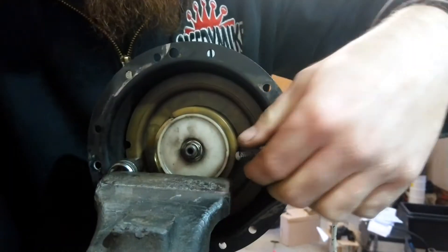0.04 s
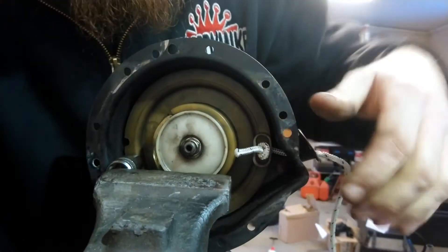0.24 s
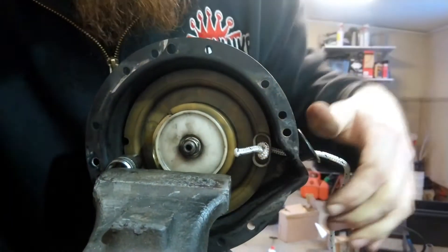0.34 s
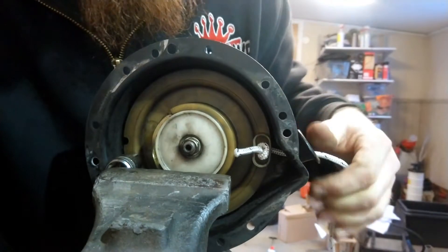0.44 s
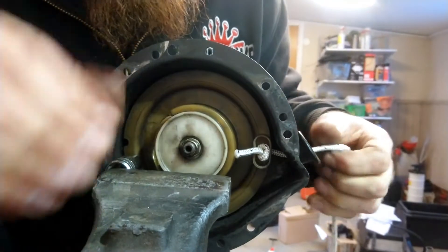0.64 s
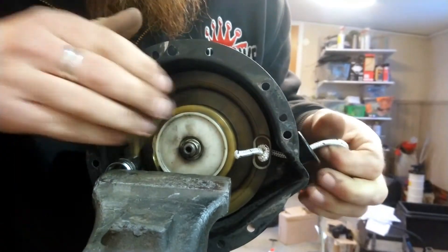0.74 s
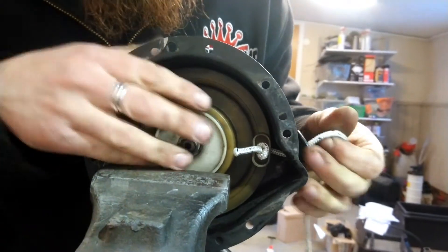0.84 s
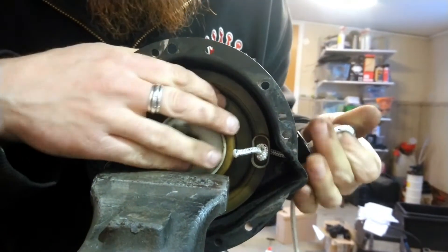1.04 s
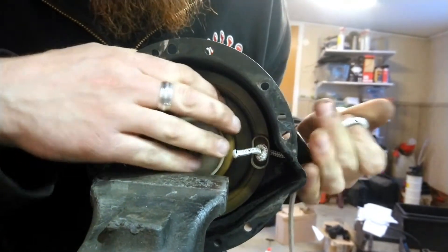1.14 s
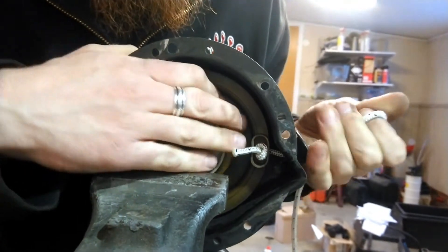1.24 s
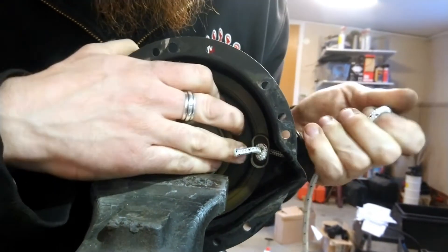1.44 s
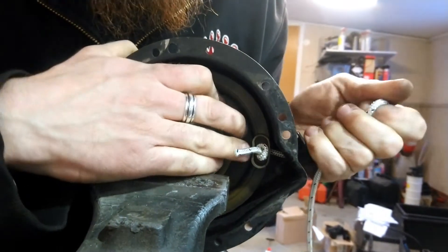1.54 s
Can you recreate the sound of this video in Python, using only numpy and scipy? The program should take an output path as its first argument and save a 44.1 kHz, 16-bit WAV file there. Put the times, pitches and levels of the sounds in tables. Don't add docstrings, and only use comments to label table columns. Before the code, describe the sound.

Close up in a home workshop, hands and rope knock a clamped metal shell: a small tap, scuffing, a louder low clack, then near quiet with soft hissing skin brushes over a faint fan hum and hiss.

```python
import sys
import numpy as np
from scipy import signal
from scipy.fft import rfft, irfft
from scipy.io import wavfile
from scipy.ndimage import uniform_filter1d

SR = 44100
rng = np.random.default_rng(int(sys.argv[2]) if len(sys.argv) > 2 else 0)


def level_to_linear(level):
    exponent = np.asarray(level, float) / 20
    return 10 ** exponent


def dump(signal):
    limited = np.clip(np.atleast_2d(signal).T, -1, 1)
    pcm = np.round(limited * 32767).astype(np.int16)
    wavfile.write(sys.argv[1], SR, pcm)


N = 70560


def read(points, hz):
    f, v = np.transpose(points)
    return np.interp(np.log(hz + 1), np.log(f + 1), v)


def curve(points):
    s, db = np.transpose(points)
    return level_to_linear(np.interp(np.arange(N) / SR, s, db))


def evened(x):
    return x / np.sqrt(np.mean(x ** 2) + 1e-20)


def add(mix, s, sound):
    part = mix[round(s * SR):][:len(sound)]
    part += sound[:len(part)]


def play(make, rows):
    track = np.zeros(N)
    for row in rows:
        add(track, *make(*row))
    return track


def resonate(x, hz, width):
    r = np.exp(-np.pi * width / SR)
    return signal.lfilter([1 - r, 0, r - 1], [1, -2 * r * np.cos(2 * np.pi * hz / SR), r * r], x)


def coloured(table):
    gain = level_to_linear(read(table, np.fft.rfftfreq(N, 1 / SR)))
    return evened(irfft(rfft(rng.standard_normal(N)) * gain, N))


def alike(a, b, same):
    same = np.clip(same, 0, 0.99)
    return np.array([a, same * a + np.sqrt(1 - same ** 2) * b])


def ring(t, hz, db, t60, rise):
    return level_to_linear(db - 60 * t / t60) * (1 - np.exp(-t / rise)) * np.sin(2 * np.pi * hz * t)


# (time [s], shell ring [dB], shell pitch [Hz], bench thud [dB], crack [dB])
KNOCKS = [(0.2018, -40, 427, -55, -47), (0.2044, -19.5, 703, -55.5, -47.5), (0.2063, -16, 491.4, -40, -49),
          (0.361, -14, 333, -19.5, -37.5), (0.367, -32, 684, -26, -45.5), (0.373, -26.5, 599, -23.5, -43.5),
          (.3765, -26, 548, -31.5, -41), (0.3821, -6, 453, -30, -28.5), (0.3984, -18, 463, -30.5, -56),
          (.642, -47, 381, -58.5, -51), (1.063, -52, 737, -49.5, -79), (1.506, -57, 766, -50.5, -81.5)]
# (multiple of shell pitch, level [dB], t60 [s])
SHELL_MODES = [(1, -1, 0.033), (1.38, -4, 0.019), (2.4, -11, 0.014), (2.8, -17, .02), (3.6, -22, 0.0097),
               (4.6, -23.5, 0.011)]
# (frequency [Hz], level [dB], t60 [s])
BENCH_MODES = [(66.6, -15.5, 0.42), (104.6, 0, .1), (144.4, 4, 0.056), (236.5, -3, 0.13), (305, -5.5, 0.03),
               (385, -23, 0.013)]


def knock(s, ring_db, hz, thud_db, crack_db):
    shell_rise_s, thud_rise_s, crack_s = 0.0017, 0.0038, 0.00037
    t = np.arange(9000) / SR
    shell = sum(ring(t, hz * k, db, t60, shell_rise_s) for k, db, t60 in SHELL_MODES)
    bench = sum(ring(t, f, db, t60, thud_rise_s) for f, db, t60 in BENCH_MODES)
    contact = resonate(resonate(rng.standard_normal(len(t)), 2600, 1300), 2600, 2700)
    crack = evened(contact) * np.exp(-t / crack_s)
    return s, level_to_linear(thud_db) * bench - level_to_linear(ring_db + 3.5) * shell + level_to_linear(crack_db) * crack


# (time [s], level [dB], pitch [Hz], t60 [s])
LINGERS = [(.212, -51.5, 430, .5), (.215, -57, 515, 0.39), (.385, -41, 468, 0.5), (.405, -41, 432, 0.13),
           (.385, -45, 244, 0.44), (.385, -42.5, 346.5, .2), (.385, -61.5, 622, 0.5),
           (.39, -60.5, 715, 0.62), (.39, -56.5, 785, 0.58), (.4, -64.5, 1065, 0.47)]


def linger(s, db, hz, t60):
    rise_s = 0.0032
    return s, ring(np.arange(20000) / SR, hz, db + 3.5, t60, rise_s)


# (time [s], length [s], level [dB], pitch [Hz])
SLIPS = [(0, 0.013, -53.5, 410), (0.104, 0.024, -61.5, 400), (.112, 0.021, -57.5, 539),
         (0.2, 0.025, -54.5, 270), (.094, 0.018, -56.5, 500), (.116, 0.022, -51, 345),
         (0.19, 0.019, -55.5, 310), (0.014, 0.021, -64, 1210), (.31, 0.033, -53, 720),
         (0.5, .03, -53.5, 790), (.116, .025, -57, 830), (0.2045, 0.0052, -29.5, 688),
         (.2062, 0.0044, -31.5, 850), (0.2, 0.0061, -36, 1175), (.3615, .006, -35.5, 1233),
         (.3775, 0.007, -36, 828), (.388, 0.0079, -37.5, 785), (.224, 0.014, -40, 504),
         (.245, 0.024, -52, 440), (0.268, 0.027, -44, 524), (0.297, 0.034, -40, 538),
         (.308, 0.0205, -39.5, 450), (.334, 0.022, -38.5, 441), (.333, 0.032, -41.5, 480),
         (.352, 0.011, -38.5, 491), (.382, .006, -35, 1100), (0.413, 0.008, -47, 465),
         (0.437, 0.018, -51.5, 437), (0.467, 0.0098, -48, 510), (.488, 0.024, -49, 510),
         (.54, 0.064, -57, 480)]


def slip(s, length, db, hz):
    t = np.arange(0, length, 1 / SR)
    return s, level_to_linear(db + 4.0) * np.sin(np.pi * t / length) ** 0.3 * np.sin(2 * np.pi * hz * t)


# (time [s], level [dB], pitch [Hz], t60 [s])
SWAYS = [(0.21, -50.5, 85.5, 0.18), (0.268, -59.5, 76.4, 0.2), (0.383, -49, 62.9, .2),
         (0.442, -40, 113, 0.098), (0.539, -52.5, 84.8, 0.15), (0.897, -57.5, 74, 0.28),
         (1.032, -63, 68, 0.31), (1.06, -53, 155, 0.22), (1.13, -62, 62.4, 0.23), (1.236, -53, 250, 0.086),
         (1.247, -58, 95.5, 0.097), (1.351, -64, 75.6, 0.21), (1.492, -57, 159.6, 0.081)]


def sway(s, db, hz, t60):
    rise_s = 0.018
    return s, ring(np.arange(16000) / SR, hz, db + 11.0, t60, rise_s)


def scuff(s, hz, length, db, width, skew):
    noise = rng.standard_normal(16000)
    progress = np.clip(np.arange(16000) / SR / length, 0, 1)
    shape = np.sin(np.pi * progress ** skew) ** 0.48
    return s, level_to_linear(db) * shape * evened(resonate(resonate(noise, hz, width), hz, width))


# (time [s], centre [Hz])
FLICK_AT = [(.206, 2100), (.222, 4000), (.225, 8700), (.3, 3200), (.328, 4200), (.3518, 5500),
            (.3518, 7500), (.352, 13000), (.353, 4000), (.361, 1900), (.3615, 3000), (.366, 2200),
            (.205, 1150), (.376, 1900), (.361, 6200)]
# (length [s], level [dB], width [Hz])
FLICKS = [(0.01185, -39.5, 580), (0.013, -54, 1800), (0.022, -67.5, 330), (0.017, -61, 300),
          (0.025, -60, 1500), (0.0075, -41, 1500), (0.0078, -48.5, 1000), (0.011, -61.5, 8400),
          (0.0064, -44.5, 600), (0.0093, -28.5, 750), (0.0026, -50, 900), (0.022, -39, 660),
          (0.0067, -40.5, 430), (0.026, -49, 1500), (0.023, -60, 2500)]


def flicks():
    rows = [(*at, *shape, 0.4) for at, shape in zip(FLICK_AT, FLICKS)]
    return play(scuff, rows)


# (time [s], centre [Hz])
STROKE_AT = [(.625, 4800), (.885, 1070), (.89, 3150), (.895, 4400), (.93, 4520), (.98, 765), (1.17, 1070),
             (1.175, 3580), (1.2, 4900), (1.24, 2150), (1.37, 5850), (1.4, 765), (.96, 4950), (.93, 3650)]
# (length [s], level [dB], width [Hz])
STROKES = [(0.08, -67.5, 1700), (0.11, -70.5, 51), (0.23, -70.5, 170), (0.24, -65, 2400), (0.16, -69, 80),
           (0.36, -67, 85), (0.11, -65.5, 79), (0.12, -64, 120), (0.058, -56.5, 740), (0.12, -64.5, 470),
           (0.062, -67, 79), (0.5, -70, 170), (.12, -66.5, 220), (0.17, -71.5, 200)]


def palm():
    rows = [(*at, *shape, 0.72) for at, shape in zip(STROKE_AT, STROKES)]
    return np.array([play(scuff, rows) for port in range(2)])


# (time [s], level [dB])
DRAG = [(0, -55.5), (.05, -67), (.12, -55), (.16, -69.5), (.19, -68.5), (.3, -53), (.36, -57.5),
        (.45, -54.5), (.6, -63.5), (.74, -85)]


def creeping():
    hum_hz, hum_width_hz, rumble_db = 461, 70, 3.5
    hum = resonate(resonate(rng.standard_normal(N), hum_hz, hum_width_hz), hum_hz, hum_width_hz * 2)
    rumble = resonate(resonate(rng.standard_normal(N), 240, 390), 384, 320)
    return curve(DRAG) * (evened(hum) + level_to_linear(rumble_db) * evened(rumble))


# (time [s], level [dB])
RUB = [(0, -60.5), (.06, -61.5), (.18, -63.5), (.225, -56), (.26, -61), (.34, -55.5), (.385, -62),
       (.43, -65), (.62, -68.5), (.7, -71.5), (.878, -73), (.895, -67), (1.06, -63), (1.13, -65),
       (1.215, -58.5), (1.33, -63.5), (1.35, -64.5), (1.38, -63.5)]
# (frequency [Hz], width [Hz], level [dB])
RUB_PEAKS = [(3168, 160, 4.5), (4436, 100, -0.5), (5140, 220, 4), (5940, 37, -9), (6880, 100, 1)]
# (frequency [Hz], level [dB per Hz])
RUB_BED = [(150, -2.5), (300, -6.5), (630, -12), (1400, -8), (4920, -12.5), (7300, -16.5), (7800, -40),
           (15000, -39.5)]


def rubbing():
    bed_db, peak_db, grain_db, likeness = 3, -7, 1, 0.17
    grain = level_to_linear(grain_db * evened(uniform_filter1d(rng.standard_normal(N), size=300)))
    ports = []
    for noise in rng.standard_normal((2, N)):
        peaks = sum(level_to_linear(db) * evened(resonate(noise, hz, w)) for hz, w, db in RUB_PEAKS)
        ports.append(level_to_linear(bed_db) * coloured(RUB_BED) + level_to_linear(peak_db) * evened(peaks))
    return curve(RUB) * evened(grain) * alike(*ports, likeness)


# (frequency [Hz], t60 [s])
ROOM_DECAY = [(80, 0.35), (250, 0.47), (500, 0.48), (1000, 0.7), (2000, 0.53), (5000, 0.31), (12000, 0.14)]
# (frequency [Hz], left-right likeness [0 to 1])
ROOM_SAME = [(100, 0.72), (400, 1), (1000, .2), (4000, 0.037)]


def room(x):
    hz, t, z = signal.stft(rng.standard_normal((2, SR // 2)), SR, nperseg=256)
    z = alike(*z, read(ROOM_SAME, hz)[:, None])
    decay = level_to_linear(-60 * t / read(ROOM_DECAY, hz)[:, None])
    tail = signal.istft(z * decay, SR, nperseg=256)[1]
    build_up = np.clip(np.arange(tail.shape[1]) / SR / 0.011, 0, 1) ** 2
    tail = tail * build_up
    return signal.fftconvolve(x[None], tail / np.linalg.norm(tail[0]), axes=1)[:, :N]


def fan():
    hum_hz, hum_db, swing = 152, -67.5, 5.7
    whine_hz, whine_db = 15730, -85
    t = np.arange(N) / SR
    waver = level_to_linear(4.6 * np.sin(2 * np.pi * 0.96 * t + 0.45) + 1.4 * np.sin(2 * np.pi * 2.7 * t))
    wander = swing * np.sin(2 * np.pi * 0.68 * t) / 2
    hum = np.sqrt(2) * waver * np.sin(2 * np.pi * hum_hz * t + wander)
    whine = resonate(rng.standard_normal(N), whine_hz, 5.2) * 40
    return level_to_linear(hum_db) * hum + level_to_linear(whine_db) * whine


# (frequency [Hz], level [dB per Hz])
FLOOR = [(40, 7.5), (330, 3.5), (650, -20), (2700, -8), (7300, -34), (8000, -17.5), (12000, -24.5),
         (15300, -13.5)]
# (frequency [Hz], left-right likeness [0 to 1])
FLOOR_SAME = [(100, 1), (500, 0.3), (1500, 0.25), (4000, 0.27), (9000, 0.033)]


def floor():
    same = read(FLOOR_SAME, np.fft.rfftfreq(N, 1 / SR))
    a, b = rfft(coloured(FLOOR)), rfft(coloured(FLOOR))
    return level_to_linear(-65.5) * irfft(alike(a, b, same), N)


def leaning(x, table):
    lean = level_to_linear(read(table, np.fft.rfftfreq(N, 1 / SR)) / 2)
    return irfft(rfft(x) * np.array([lean, 1 / lean]), N)


# (frequency [Hz], left over right [dB])
HANDS_LEAN = [(60, -0.5), (250, 2.5), (1300, 2), (2500, -3.5), (5000, -5.5), (8000, 17.5), (12000, 6.5)]
# (frequency [Hz], left over right [dB])
RUB_LEAN = [(500, 5), (2500, -4), (6000, -3.5), (9000, 24.5)]


def scene():
    wet_db = -17.5
    hands = play(knock, KNOCKS) + play(linger, LINGERS) + play(slip, SLIPS) + play(sway, SWAYS)
    hands = hands + flicks() + creeping()
    handling = leaning(hands + level_to_linear(wet_db) * room(hands), HANDS_LEAN)
    friction = leaning(rubbing() + palm(), RUB_LEAN)
    return handling + friction + fan() + floor()


def top_cut(x):
    return signal.sosfilt(signal.butter(12, 16610, fs=SR, output="sos"), x)


# (frequency [Hz], right port later [ms])
PORT_LAG = [(100, 0.4), (500, 0.24), (1500, 0.23), (3000, 0.19), (8000, 0.19)]


def record(dry):
    low_cut_hz, edge_hz = 46, 15950
    cut = signal.sosfilt(signal.butter(4, low_cut_hz, "high", fs=SR, output="sos"), dry)
    hz = np.fft.rfftfreq(N, 1 / SR)
    lag_s = read(PORT_LAG, hz) / 1000 * np.array([[0], [1]])
    late = np.exp(-2j * np.pi * hz * lag_s) * (hz < edge_hz)
    mix = irfft(rfft(cut) * late, N)
    return top_cut(mix)


dry = scene()
out = record(dry)
dump(out)
```